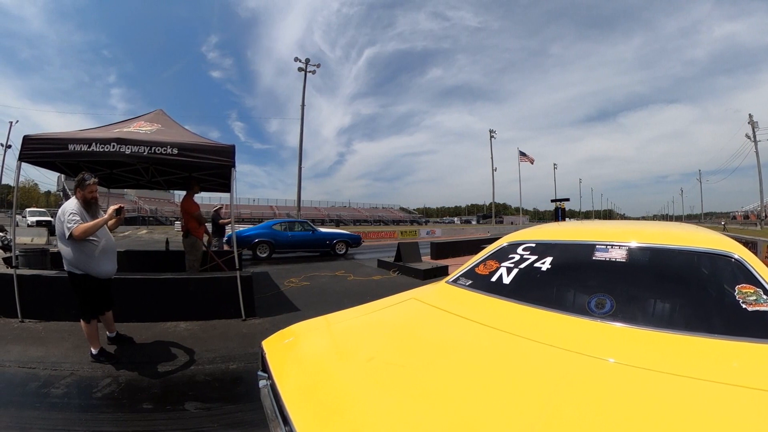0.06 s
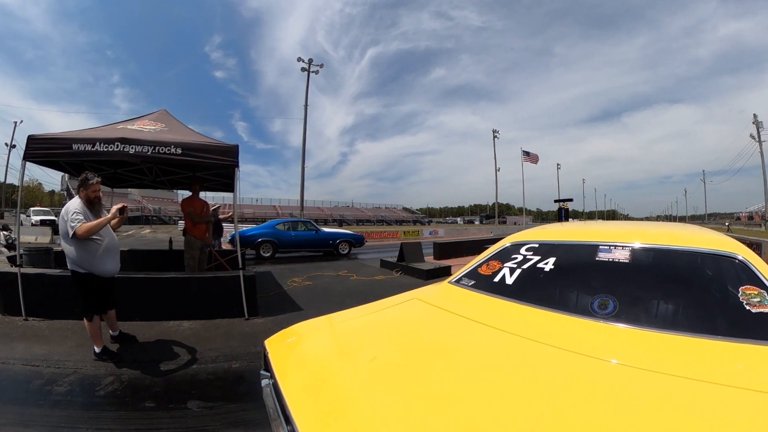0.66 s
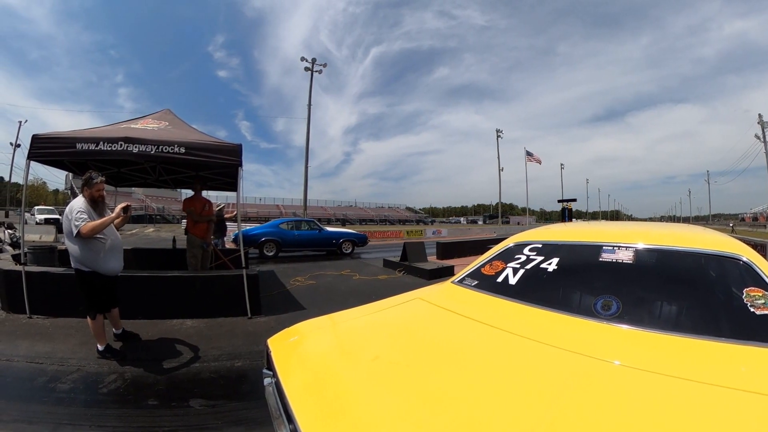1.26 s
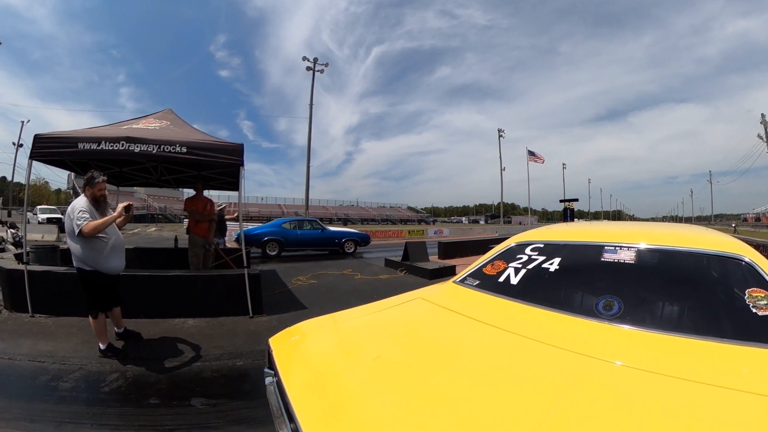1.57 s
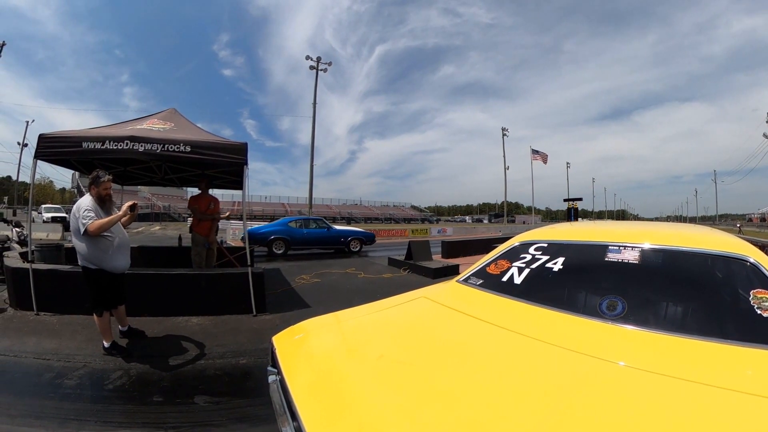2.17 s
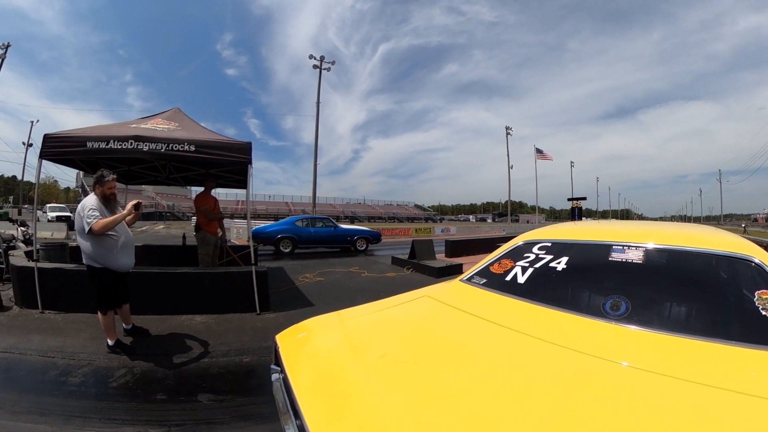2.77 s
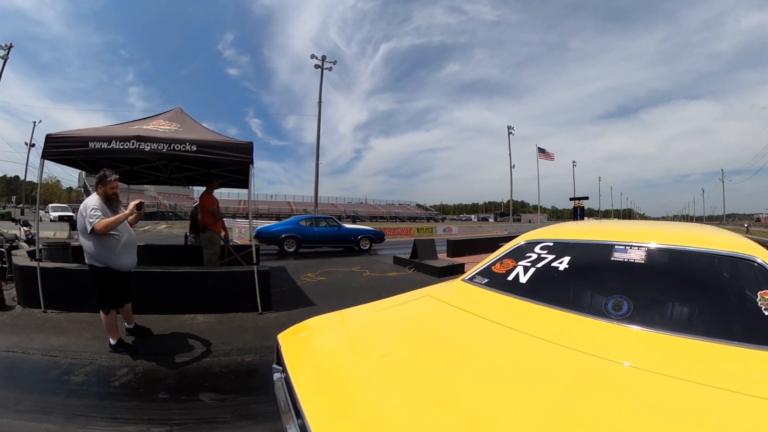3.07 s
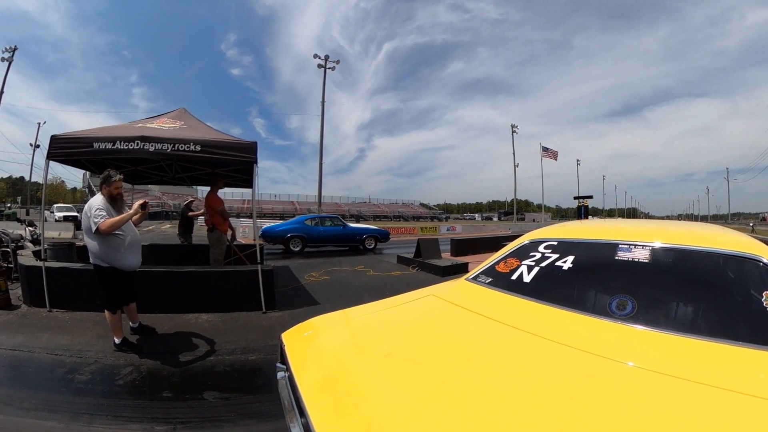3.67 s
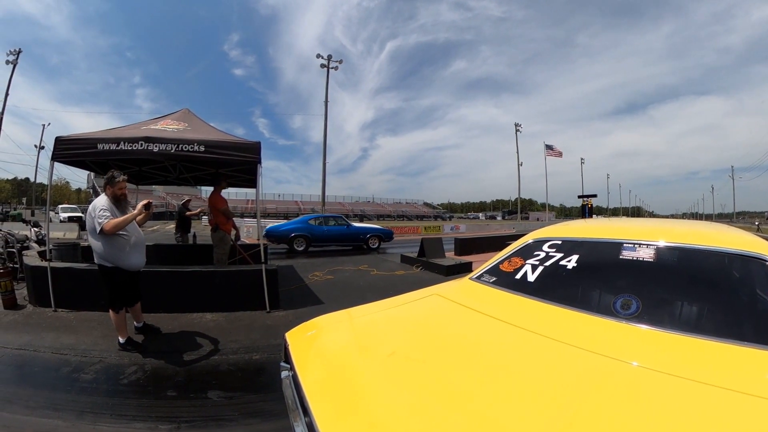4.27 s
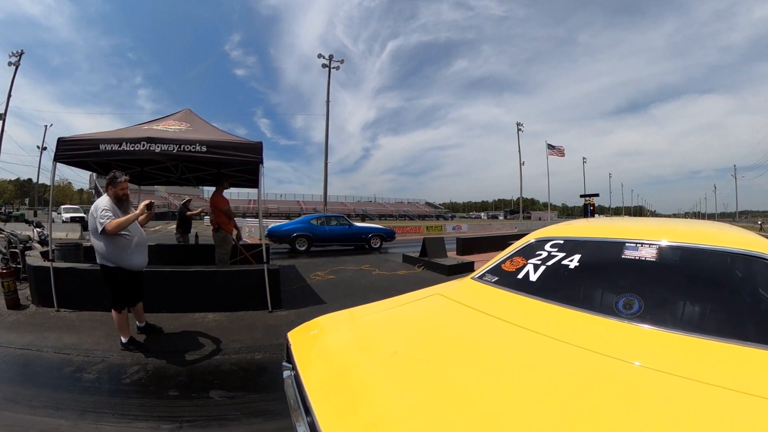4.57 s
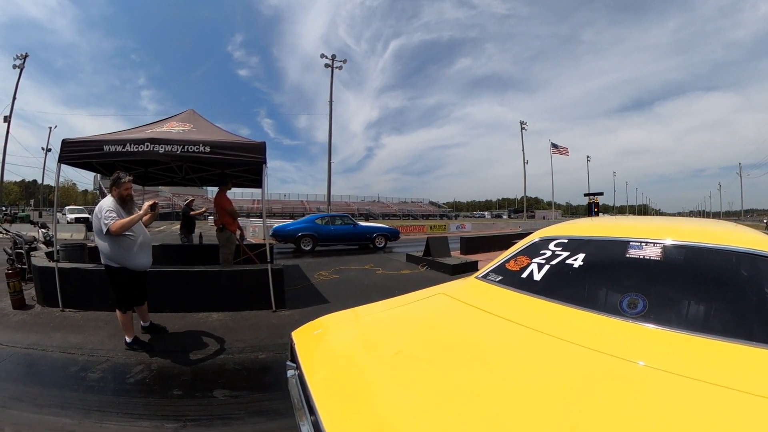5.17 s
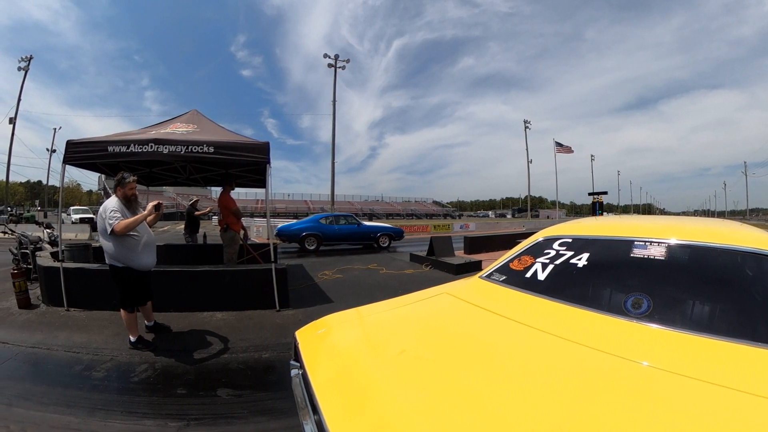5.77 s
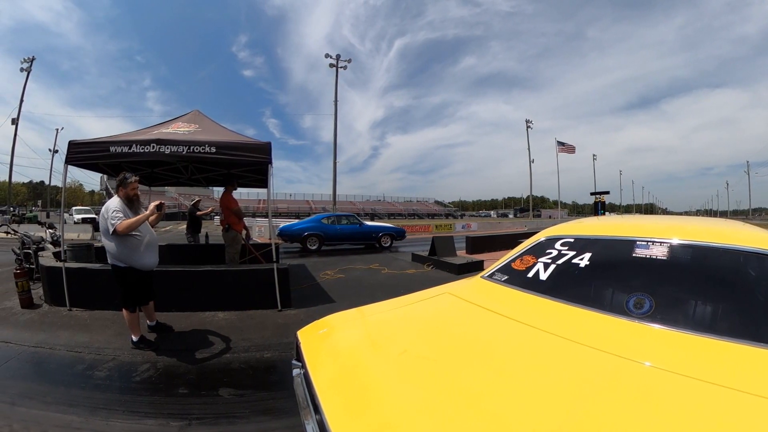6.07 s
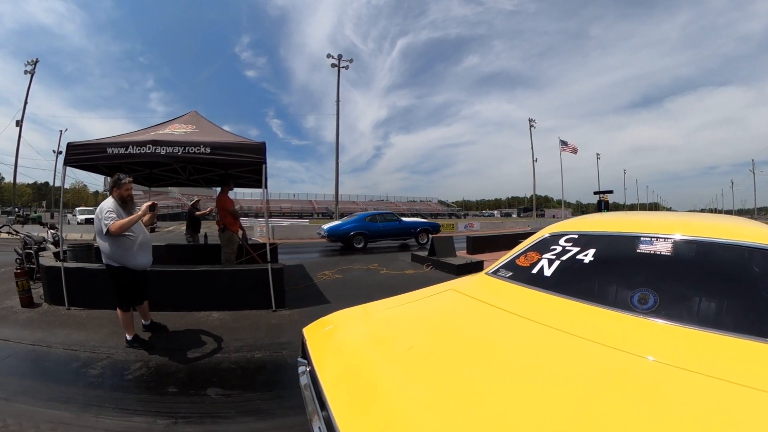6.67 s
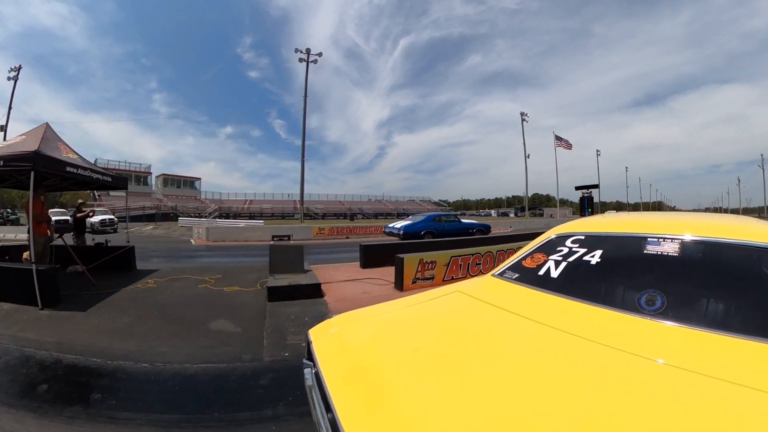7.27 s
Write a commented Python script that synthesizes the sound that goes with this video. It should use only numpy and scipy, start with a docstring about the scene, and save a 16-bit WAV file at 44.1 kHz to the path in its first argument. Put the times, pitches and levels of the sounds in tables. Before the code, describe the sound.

A V8 drag car idles fast and lumpy, then a second car launches farther off and the near one roars to full throttle.

```python
"""Two V8 drag cars on a start line, heard beside the near one. It loads up against the brake at a lumpy
fast idle: open pipes boom and rasp, the intake hisses, misfires thump. From 3.1 s one cylinder skips;
from 4.85 s it clears under part throttle. At 6.4 s the far car launches with a roar and a rising howl,
and at 6.7 s the near one goes to full throttle. A fast gain control holds the loud exhaust level."""
import sys
import numpy as np
from scipy import signal
from scipy.fft import rfft, irfft, next_fast_len
from scipy.io import wavfile
from scipy.ndimage import uniform_filter1d, minimum_filter1d, map_coordinates

SR = 44100
rng = np.random.default_rng(int(sys.argv[2]) if len(sys.argv) > 2 else 0)


def file_out(sig):
    """Save sig as 16-bit WAV at sys.argv[1]."""
    # one column per channel
    cols = np.atleast_2d(sig).T
    # limit, then scale
    lim = np.clip(cols, -1, 1)
    pcm = np.round(lim * 32767).astype(np.int16)
    wavfile.write(sys.argv[1], SR, pcm)


N = 322371
T = np.arange(N) / SR


def amp(db):
    return 10 ** (np.asarray(db) / 20)


def unit(x):
    return x / np.sqrt(np.mean(x ** 2) + 1e-20)


def running_rms(x, window_s):
    """RMS level, smoothed twice."""
    size = max(int(window_s * SR), 1)
    return np.sqrt(np.abs(uniform_filter1d(uniform_filter1d(x ** 2, size), size)) + 1e-12)


def steady(x):
    """x with its slow level held at 1."""
    return x / running_rms(x, window_s=.1)


def ramp(start_s, length_s):
    """Linear rise from 0 to 1."""
    return np.clip((T - start_s) / length_s, 0, 1)


def wobble(rate_hz):
    """Smooth random curve, rate_hz knots a second."""
    return map_coordinates(rng.standard_normal(int(N * rate_hz / SR) + 4), [T * rate_hz])


def coloured(x, shape, modes=()):
    """Minimum-phase filter of (frequency [Hz], gain [dB]) points, plus narrow resonances."""
    size = 2 * next_fast_len(N // 2 + SR // 4)
    hz = np.fft.rfftfreq(size, 1 / SR)
    shape_hz, shape_db = np.transpose(shape)
    gain_db = np.interp(np.log(hz + 1), np.log(shape_hz + 1), shape_db)
    cepstrum = irfft(np.log(amp(gain_db)))
    cepstrum[1:size // 2] *= 2
    cepstrum[size // 2 + 1:] = 0
    ring = 1 + sum(amp(db) * 1j * hz * width_hz / (centre_hz ** 2 - hz ** 2 + 1j * hz * width_hz)
                   for centre_hz, width_hz, db in modes)
    return irfft(rfft(x, size) * np.exp(rfft(cepstrum)) * ring, size)[:N]


def pulses(times, sizes):
    """Impulses at fractional sample times."""
    whole, part = np.floor(times).astype(int), times % 1
    before = np.bincount(whole, sizes * (1 - part), N + 2)
    after = np.bincount(whole + 1, sizes * part, N + 2)
    return (before + after)[:N]


def cycles(rpm):
    """Count of four-stroke cycles, two turns each."""
    return np.cumsum(rpm) / 120 / SR


# Far engine speed, as heard: (time [s], speed [rpm])
FAR_SPEED_RPM = [(6.2, 2998), (6.46, 3850), (6.77, 5123), (6.92, 5446), (7.1, 5447), (7.31, 5194)]
# Far exhaust lines: (order [x cycle rate], relative level [dB])
HOWL_ORDERS_DB = [(6, -4.5), (8, 4), (10, -6), (11, -8), (13, -13.5), (14, -13.5), (16, -11), (18, -7),
                  (21, -13), (23, -6.5), (26, -15), (29, -5), (32, -16), (36, -11.5), (37, -9)]
# Gas rushing from wide-open pipes: (frequency [Hz], gain [dB])
ROAR_SHAPE_DB = [(250, -24.5), (420, -1), (500, 1), (720, -11.5), (1030, -9), (1280, -8), (1500, -10.5),
                 (1650, -12.5), (1900, -16), (3400, -32), (5300, -26), (8300, -39), (10500, -48.5),
                 (14000, -75.5)]


def far_car(roar_s=6.39, roar_db=-23, howl_s=6.52, howl_db=-18.5, tear_turns=.085, recede_db_per_s=3.5):
    """Far launch: a roar of gas and a howl, torn by uneven firing, fade as the car pulls away."""
    rpm = np.interp(T, *np.transpose(FAR_SPEED_RPM))
    cycle = cycles(rpm * (1 + .0022 * wobble(60)))
    tilt_db_per_octave = 20 * (rpm / rpm.max() - 1)  # brightens with speed
    howl = np.zeros(N)
    for order, db in HOWL_ORDERS_DB:
        level_db = db + tilt_db_per_octave * np.log2(order / 8) + .5 * wobble(13)
        phase_turns = order * cycle + rng.random() + tear_turns * wobble(70)
        howl += amp(level_db) * np.cos(2 * np.pi * phase_turns)
    crackle_db = np.cos(2 * np.pi * 8 * cycle) + wobble(30)
    gas = amp(crackle_db) * rng.standard_normal(N)
    howl = amp(howl_db) * ramp(howl_s, .1) * steady(howl)
    roar = amp(roar_db) * np.sqrt(ramp(roar_s, .23)) * unit(coloured(gas, ROAR_SHAPE_DB))
    return amp(-recede_db_per_s * np.maximum(T - howl_s, 0)) * (howl + roar)


# Near engine misfires: (time [s], level [dB])
MISFIRE_LEVELS_DB = [(.82, -18), (.985, -18), (1.67, -20), (1.9, -20), (2.13, -17), (3.445, -16),
                     (3.93, -17), (4.255, -15), (4.77, -18), (4.88, -17), (4.985, -17), (5.28, -16),
                     (5.475, -14), (6.125, -18), (6.53, -19)]


def misfires(width_s=.004):
    """A missed firing leaves a gap in the exhaust flow: one slow pressure swing, a dull thump."""
    thumps = np.zeros(N)
    for time_s, db in MISFIRE_LEVELS_DB:
        offset = (T - time_s) / width_s
        thumps += amp(db) * offset * np.exp(-np.minimum(offset ** 2 / 2, 50))
    return thumps


# The eight firings of a cycle: (bank [0 or 1], rasp level [dB], unsteadiness [0-1])
FIRING_ORDER = [(0, -2.5, 0.94), (1, 0, 0.94), (1, 3, 0.85), (0, -3, 0.6), (1, 3, 0.5), (0, 1, 0.1),
                (0, 0.5, 0.94), (1, 4, 0.8)]
BANK, CYLINDER_RASP_DB, UNSTEADINESS = np.transpose(FIRING_ORDER)
FIRING_CYCLES = np.arange(8) / 8 + .022 * BANK  # one bank's sound has farther to go


def firings(cycle, jitter_cycles):
    """Sample time and cylinder of every firing."""
    count = int(cycle[-1]) + 1
    position = (np.arange(count)[:, None] + FIRING_CYCLES).ravel()
    position += jitter_cycles * rng.standard_normal(len(position))
    return np.interp(position, cycle, np.arange(N), right=N), np.arange(len(position)) % 8


# Valve train, belts and intake: (frequency [Hz], gain [dB])
HISS_SHAPE_DB = [(940, -28), (1600, -6.5), (2050, -2), (2240, -4), (2420, -2), (2640, -8.5), (2930, -6.5),
                 (3170, -9.5), (3750, -9), (4500, -12), (5240, -13.5), (6340, -16), (8110, -19),
                 (10700, -33), (13900, -69), (22000, -120)]
# Ringing engine metal: (frequency [Hz], width [Hz], gain [dB])
BLOCK_MODES_HZ = [(1851, 90, -1.5), (2062.4, 62, -2), (2874, 70, -3), (3792, 120, -5), (5180, 350, -6)]


def hiss(cycle, tick_db=-13, tick_scatter_db=2):
    """Intake noise flutters with the firings; closing valves tick through the block."""
    flutter_db = -.4 * np.cos(2 * np.pi * 8 * cycle) + .43 * np.cos(np.pi * cycle) + .5 * wobble(25)
    times, _ = firings(cycle, jitter_cycles=.004)
    ticks = unit(pulses(times, amp(tick_scatter_db * rng.standard_normal(len(times)))))
    air = amp(flutter_db) * rng.standard_normal(N)
    return unit(coloured(air + amp(tick_db) * ticks, HISS_SHAPE_DB, BLOCK_MODES_HZ))


# Header resonances: (frequency [Hz], gain [dB])
HEADER_SHAPE_DB = [(350, -40), (480, -4), (545, -2.5), (600, -15.5), (760, -18), (850, -1.5), (970, -2),
                   (1035, 8), (1100, -2), (1260, -6), (1420, -19), (1900, -23.5), (2600, -30), (6000, -57)]


def rasp(cycle, throttle, scatter_db=2.1, puff_decay_s=.0069, puff_depth=.25):
    """Each pulse's sharp front and puff of gas ring the headers; timing evens out at full throttle."""
    wander_cycles = .0035 * (1 - throttle ** 2) * wobble(300)  # slow, lean burn at idle
    times, cylinder = firings(cycle + wander_cycles, jitter_cycles=.001)
    sizes = amp(CYLINDER_RASP_DB[cylinder] + scatter_db * rng.standard_normal(len(times)))
    fronts = pulses(times, sizes)
    puffs = unit(signal.lfilter([1], [1, -np.exp(-1 / (puff_decay_s * SR))], fronts))
    gas = unit((1 - puff_depth + puff_depth * puffs) * rng.standard_normal(N))
    gas_db = 1 - 9 * throttle ** 2
    surge_db = np.cos(np.pi * cycle)  # strong and weak cycles alternate
    return amp(surge_db) * steady(coloured(unit(fronts) + amp(gas_db) * gas, HEADER_SHAPE_DB))


# Thud of a weak or strong firing: (frequency [Hz], gain [dB])
THUD_SHAPE_DB = [(12, -27.5), (26, -13.5), (50, -9.5), (80, -4.5), (135, -6), (190, -7.5), (238, -20.5),
                 (295, -7.5), (400, -13), (520, -21.5), (700, -34.5), (1500, -90.5)]


def lope(cycle, skipping):
    """Uneven combustion: a weak firing leaves fuel behind, so that cylinder fires hard next time."""
    times, cylinder = firings(cycle, jitter_cycles=.002)
    luck = rng.standard_normal(len(times)).reshape(-1, 8)
    burn = signal.lfilter([1], [1, .5], luck, axis=0).ravel()
    surplus = np.tanh(burn) * UNSTEADINESS[cylinder]
    # skipping: the second cylinder catches only every other cycle
    every_other = (-1) ** (np.arange(len(times)) // 8)
    surplus += 1.2 * np.interp(times, np.arange(N), skipping) * every_other * (cylinder == 1)
    return steady(coloured(pulses(times, surplus), THUD_SHAPE_DB))


# Uneven firing of two banks: (order [x cycle rate], idle [dB], half throttle [dB], wide open [dB])
BOOM_ORDERS_DB = [(2, -12.5, -9, -4), (3, -20.5, -13.5, -12), (4, -11.5, -11.5, -3.5),
                  (5, -12.5, -9.5, -18), (6, -6, -7, -1.5), (7, -13.5, -18.5, -1.5), (8, 0, 1.5, 6.5),
                  (9, -9.5, -9, -0.5), (10, -14.5, -3, 0.5), (11, -6, -10.5, -12.5), (12, -8.5, -8, -9.5),
                  (13, -13, 1.5, -9), (14, -11, -1.5, -7.5), (15, -9, -2, 4.5), (16, -0.5, -4.5, -6.5),
                  (17, -21.5, -11, -5.5), (18, -6.5, 0.5, -5.5), (19, -7.5, -14, -1.5),
                  (20, -6.5, -13.5, -9), (21, -19, 1, -3.5), (22, -11.5, -10.5, -8.5),
                  (23, -22.5, -2.5, -16), (24, -8.5, -13.5, -10.5), (25, -21, -8.5, -19.5),
                  (26, -14, -5.5, -13.5), (27, -11.5, -3.5, -3.5), (28, -14, -21.5, -1.5),
                  (29, -17.5, -23, 1.5)]
# Exhaust resonances: (frequency [Hz], gain [dB])
PIPE_SHAPE_DB = [(30, -26), (60, -17), (85, -8), (106, 0), (138, -15), (175, -15), (208, -17), (236, -32),
                 (296, -15), (355, -17), (420, -25), (540, -30), (720, -39), (1030, -29)]


def boom(cycle, throttle, skipping, dispersion_rad=.17):
    """The periodic pulse train resonates in the pipes, with the lope on top."""
    tone = np.zeros(N)
    for order, *levels_db in BOOM_ORDERS_DB:
        phase_rad = np.angle(np.sum(np.exp(-2j * np.pi * order * FIRING_CYCLES)))
        phase_rad -= dispersion_rad * order ** 2  # higher tones linger in the pipes
        gain = np.interp(throttle, [0, .5, 1], amp(levels_db))
        tone += gain * np.cos(2 * np.pi * order * cycle + phase_rad)
    lope_db = -12 - 4 * throttle ** 2
    return steady(steady(coloured(tone, PIPE_SHAPE_DB)) + amp(lope_db) * lope(cycle, skipping))


# Near engine held against the brake: (time [s], speed [rpm])
BRAKED_SPEED_RPM = [(0.0, 1733), (0.25, 1913), (0.6, 2056), (1.4, 2143), (1.7, 2096), (2.1, 2173),
                    (3.1, 2184), (3.95, 2256), (4.3, 2233), (5.25, 2416), (5.7, 2438), (6.0, 2388),
                    (6.4, 2506), (6.73, 2540)]


def near_car(squeeze_s=4.85, part_throttle=.26, launch_s=6.72, stall_rpm=5000, flare_s=.21):
    """The throttle opens in two steps, squeeze and launch; revs flare to the converter's stall speed."""
    squeeze, launch = ramp(squeeze_s, .15), ramp(launch_s, .25)
    throttle = part_throttle * squeeze + (1 - part_throttle) * launch
    skipping = .69 * ramp(start_s=3.1, length_s=.7) * (1 - ramp(squeeze_s, 1.85))
    held_rpm = np.interp(T, *np.transpose(BRAKED_SPEED_RPM))
    flare = 1 - np.exp(-(np.maximum(T - launch_s, 0) / flare_s) ** 1.62)
    rpm = held_rpm + (stall_rpm - held_rpm) * flare
    cycle = cycles(rpm * (1 + .002 * wobble(14)))

    held_octaves = np.log2(held_rpm / 2200)
    surge_db = 3 * np.exp(-((T - launch_s - .26) / .09) ** 2)  # the converter takes the load
    settling_db = 8 * np.exp(-T / .23)
    boom_db = -12.5 + 8 * held_octaves - 1.5 * squeeze + launch + surge_db
    rasp_db = -33.5 + 7.5 * held_octaves + .9 * squeeze
    hiss_db = -45 + 10.5 * held_octaves + 1.5 * squeeze + 7.5 * launch + settling_db

    exhaust = amp(boom_db) * boom(cycle, throttle, skipping) + amp(rasp_db) * rasp(cycle, throttle)
    intake = hiss(cycle)
    sizzle = unit(np.diff(intake, 4, prepend=np.zeros(4)))  # bright edge of the wide-open intake
    return exhaust + amp(hiss_db) * intake + amp(-48) * launch * sizzle


def scene():
    """Both cars, mono."""
    return (near_car() + misfires() + far_car())[None]


def record(dry, ceiling_db=-10, makeup_db=2, peak_limit=.8, top_hz=15400):
    """Fast gain control, peak limiter, band limit."""
    level = running_rms(dry[0], window_s=.022)
    overload = level / amp(ceiling_db - makeup_db)
    held = dry * amp(makeup_db) / (1 + overload ** 10) ** (1 / 10)
    peak_gain = np.minimum(1, peak_limit / (np.abs(held) + 1e-9))
    limited = held * uniform_filter1d(minimum_filter1d(peak_gain, size=400), size=300)
    return irfft(rfft(limited) * (np.fft.rfftfreq(N, 1 / SR) < top_hz), N)


dry = scene()
out = record(dry)
file_out(out)
```